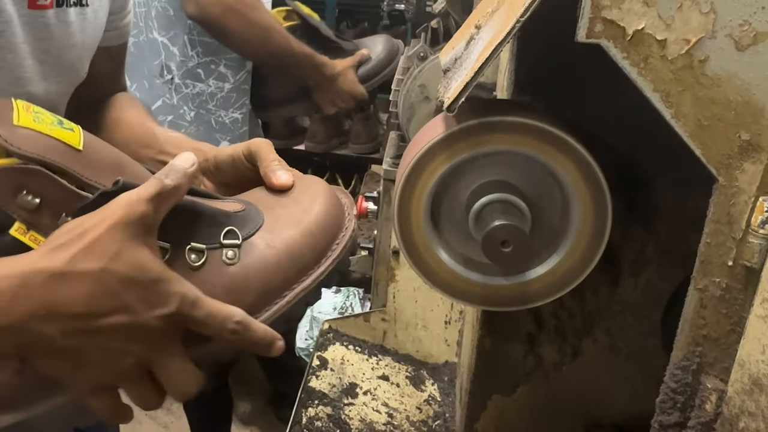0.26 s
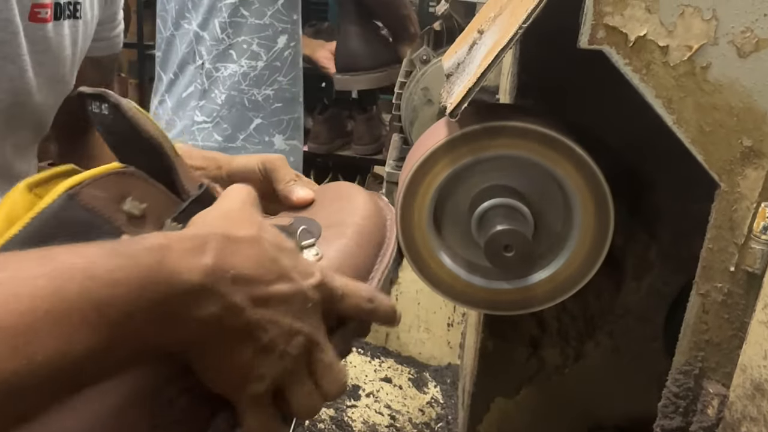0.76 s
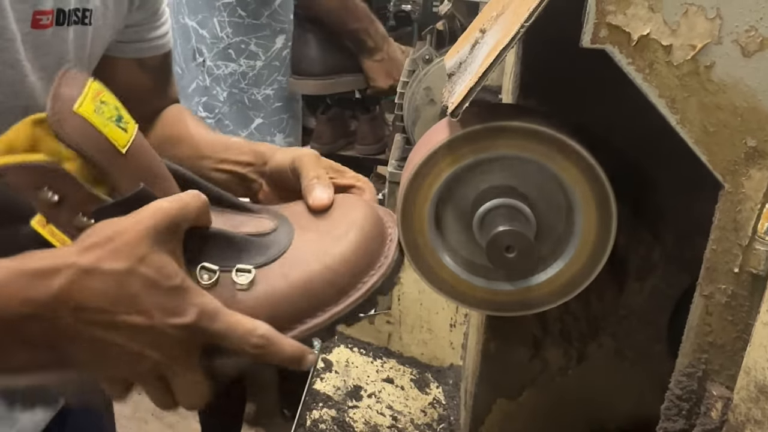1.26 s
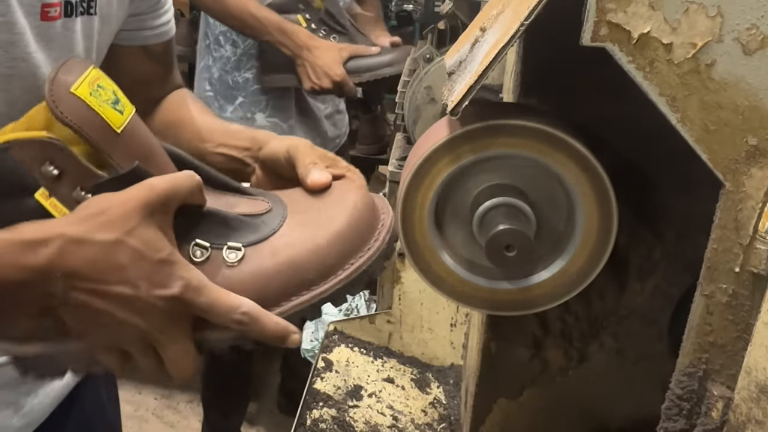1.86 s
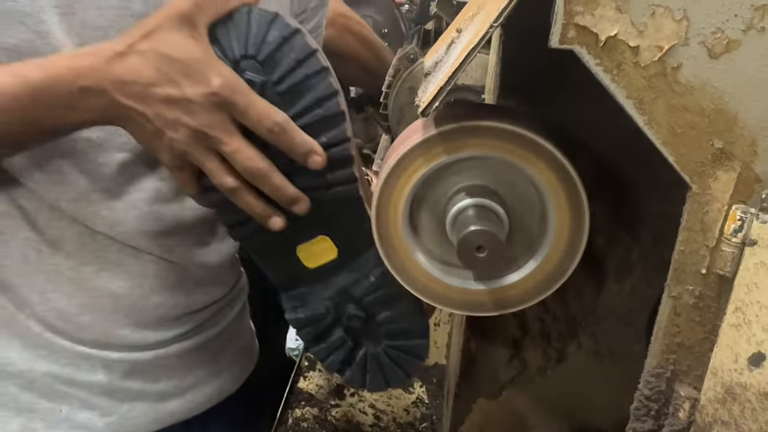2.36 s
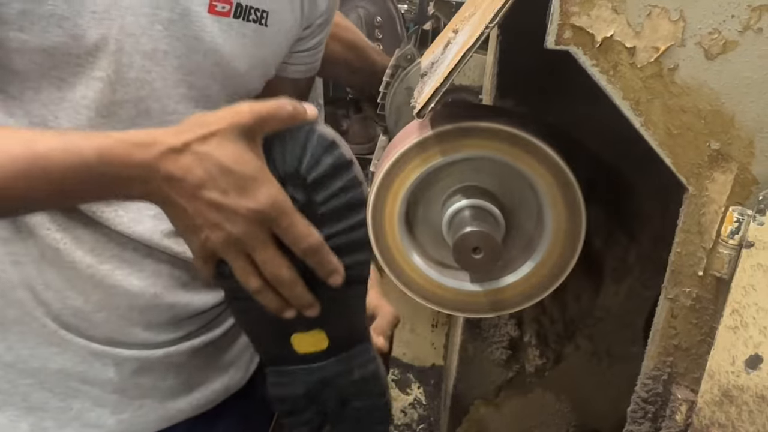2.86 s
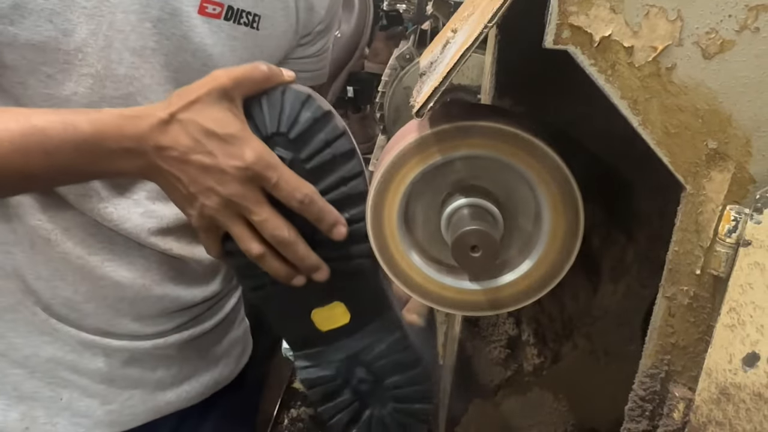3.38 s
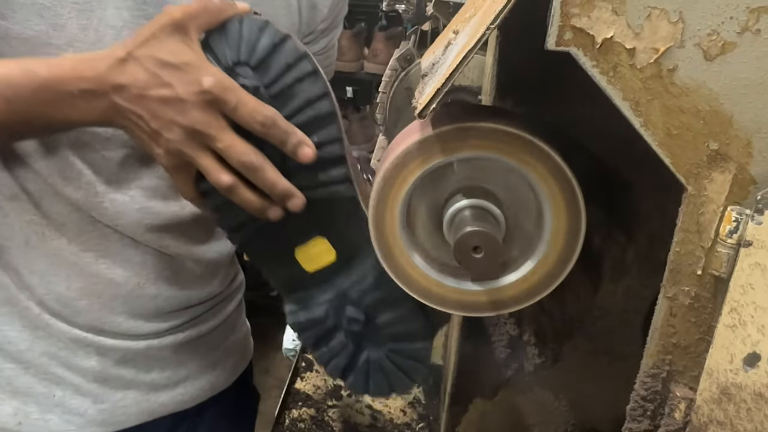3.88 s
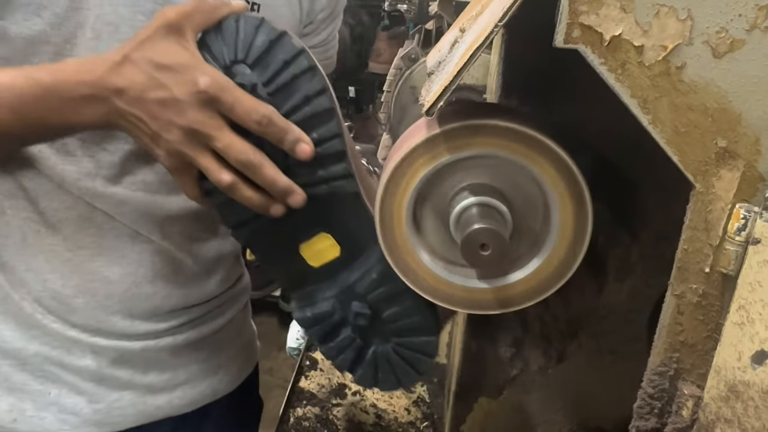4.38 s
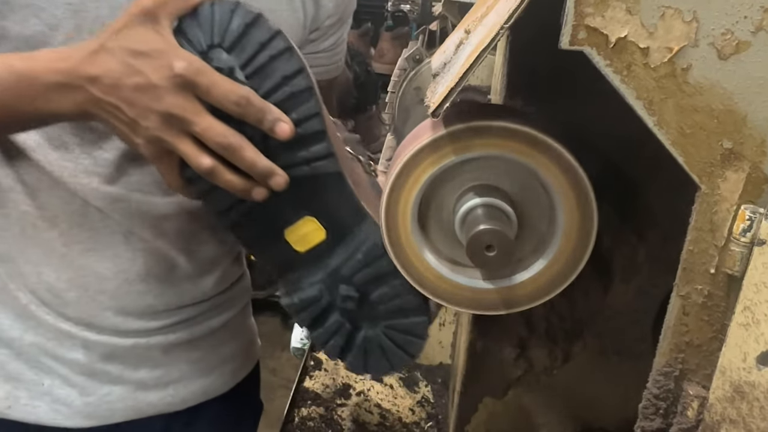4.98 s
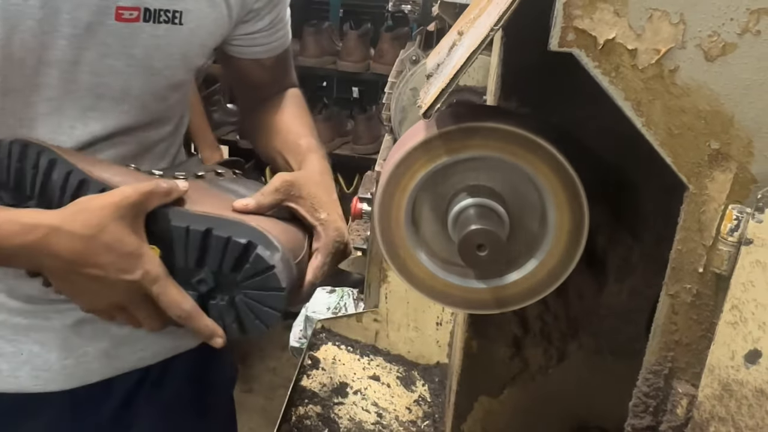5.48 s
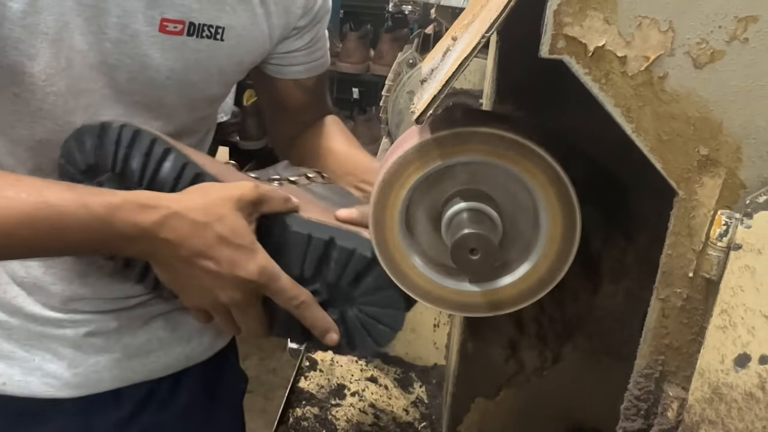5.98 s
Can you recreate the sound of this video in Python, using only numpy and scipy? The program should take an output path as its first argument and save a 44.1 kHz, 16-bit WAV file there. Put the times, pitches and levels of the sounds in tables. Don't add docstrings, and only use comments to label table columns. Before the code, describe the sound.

A boot is rubbed in short strokes on a fast spinning abrasive wheel, gritty hiss throbbing over a deep fan roar and steady hum.

```python
import sys
import numpy as np
from scipy import signal
from scipy.fft import rfft, irfft, next_fast_len
from scipy.io import wavfile
from scipy.ndimage import uniform_filter1d

SR = 44100
rng = np.random.default_rng(int(sys.argv[2]) if len(sys.argv) > 2 else 0)


def amplitude_ratio(level_db):
    exponent = np.asarray(level_db, float) / 20
    return 10 ** exponent


def generate_wav(sig):
    pcm = np.round(np.clip(np.atleast_2d(sig).T, -1, 1) * 32767).astype(np.int16)
    wavfile.write(sys.argv[1], SR, pcm)


N = 275075
T = np.arange(N) / SR

# frequency in Hz, level in dB.
ROAR_SPECTRUM = [(18, -63), (32, -37.5), (50, -19.5), (96, -13), (143, -5), (200, -12), (235, -19),
                 (300, -18), (366, -16), (413, -23), (600, -23.5), (750, -29.5), (1150, -32.5), (1800, -41),
                 (2400, -55)]
# frequency in Hz, width in Hz, lift in dB.
DUCT_MODES = [(95, 4, 4), (144.1, 23.8, 7.5), (196.7, 13.7, 8), (371.7, 35, 5), (458.2, 12.6, 10.5),
              (659, 21, 5.5)]
# time in seconds, level in dB.
ROAR_LEVEL = [(0, -18), (.7, -19), (2, -18.5), (2.5, -17), (3.5, -18), (4.1, -17), (5.1, -18.5),
              (5.7, -18.5), (6.24, -19)]
# time in seconds, level in dB.
BODY_SHIELD = [(0, -42.5), (2.1, -42.5), (2.4, -42), (4, -41.5), (4.5, -42.5), (6.24, -41)]
# left level in dB, right level in dB, left lead in radians, waver in dB.
BLADE_TONES = [
    (-30, -28, -1.03, 1.45),
    (-37, -33, -1.15, 2.15),
    (-46, -48, -1.27, 2),
    (-49.5, -48, 0.13, 1.5),
]
# frequency in Hz, level in dB.
AIR_SPECTRUM = [(1500, -8), (2200, -2), (3000, -3), (4000, -12.5), (5000, -15), (6000, -7.5), (6800, -5),
                (7600, -8.5), (9200, -22.5), (10300, -22), (11500, -55), (13000, -45), (15500, -23)]
# time in seconds, level in dB.
NEXT_WHEEL = [(0, -1), (2.0, 0.2), (2.6, -1.5), (4.3, 4.5), (5.4, -1), (6.24, 3)]
# time in seconds, peak in dB, ring in Hz, wash T60 in seconds.
KNOCKS = [
    (.383, -37, 804, 0.091),
    (.553, -32.5, 1110, 0.22),
    (.572, -43, 1390, 0.13),
    (1.207, -29.5, 850, 0.57),
    (1.231, -30.5, 1690, 0.3),
    (2.252, -33, 2020, .05),
    (3.741, -39, 1100, 0.11),
    (5.693, -33.5, 925, 0.2),
    (5.83, -37, 1280, .4),
]
# frequency in Hz, level in dB.
TOE_SPECTRUM = [(2000, -11), (2700, -10.5), (3400, -2), (4400, -5), (6000, -2.5), (7500, -3), (9800, -2),
                (11500, 3.5), (13000, -2.5), (15700, 0.5)]
# frequency in Hz, level in dB.
SIDE_SPECTRUM = [(1200, -12), (2000, -8.5), (3200, -4), (3900, -7.5), (5500, -4.5), (7000, -4),
                 (8800, -2.5), (10500, -2), (12000, 0), (14000, 0), (15700, 0)]
# frequency in Hz, width in Hz, lift in dB.
SHELL_MODES = [(4580, 560, 4.5), (6950, 280, 7), (8460, 790, 2)]
# frequency in Hz, width in Hz, lift in dB.
TOE_MODES = [(4600, 120, 10), (5200, 160, 6), (3900, 160, 4)]
# start in seconds, length in seconds, first pressure in dB,
# last pressure in dB, brightness in dB.
RESTS = [
    (.72, 0.079, -47, -47, 2),
    (1.02, 0.72, -43.5, -43, -1.5),
    (2.2, 0.082, -41, -37, -5),
    (2.3, 1.32, -40.5, -42, 3),
    (3.7, .37, -37, -42.5, 0.5),
    (4.07, .74, -43, -38.5, 0),
    (4.81, .41, -40, -44, 0),
    (5.81, .45, -41, -38, 1),
]
TOE_STROKES = [(.8, 0.091, -38.5, -27.5, -2.5), (.9, .11, -28.5, -36, 3), (1.145, .025, -37.5, -38, -1.2),
               (1.2, 0.18, -29, -29, -2), (1.385, 0.054, -35, -41.5, -2.2), (1.555, 0.013, -34, -33, -3),
               (1.592, 0.16, -30, -31, -2.2), (1.765, 0.02, -37.5, -42.5, -5),
               (2.064, .134, -29.5, -30.5, -2)]
SIDE_STROKES = [(2.34, 0.078, -40.5, -36.5, -5.5), (2.45, 0.079, -39, -34, 6.5), (2.57, .22, -38, -34.5, 2),
                (2.8, .015, -32, -35.5, 6.5), (2.85, .13, -39, -35, 1), (3.0, .19, -42.5, -31.5, 5.5),
                (3.26, 0.038, -32.5, -38.5, 3), (3.32, .04, -33, -38.5, 2), (3.37, .09, -33, -34, 3.5),
                (3.49, .06, -35, -36.5, 2), (3.6, 0.062, -31, -37.5, -5.5), (3.7, 0.15, -37.5, -34.5, 4),
                (5.0, 0.027, -42, -35, 2.5), (5.06, .12, -40.5, -34, 3), (5.51, 0.11, -39.5, -49.5, 0.5),
                (5.815, 0.045, -39, -41, 2), (5.9, 0.057, -40, -35, 5.5), (6.0, 0.19, -39.5, -37, 2.5)]
# time in seconds, offset in turns, creep in turns per second.
GRIPS = [(0, -1.5, 1.3), (1.03, .14, 1.5), (1.175, .83, 1), (1.5, .27, .55), (2.0, .66, -.6),
         (2.24, .22, -.3), (3.68, -.5, 0)]
# time in seconds, peak in dB, length in seconds.
GRAZES = [(0.996, -23, 0.01), (1.183, -17, 0.01), (1.835, -28.5, 0.0073), (1.9036, -35, 0.01),
          (1.979, -24.5, 0.013), (2.0254, -19.5, 0.0091), (2.32, -24, 0.011), (2.456, -22, 0.014),
          (2.646, -21, 0.009), (2.8, -21, 0.0067), (2.931, -20.5, 0.024), (2.976, -21, 0.014),
          (3.039, -22, 0.013), (3.07, -26, 0.012), (3.1, -23, 0.013), (3.1335, -19, 0.0067),
          (3.267, -21, 0.02), (3.314, -21, 0.0079), (3.595, -22.5, 0.016), (3.705, -25, 0.0087),
          (4.222, -29.5, 0.017), (4.436, -35, 0.012), (4.547, -26, 0.014), (4.86, -24.5, 0.014),
          (5.02, -30, 0.0086), (5.242, -31, 0.014), (5.809, -23, 0.02)]
# frequency in Hz, left lead in radians, likeness 0-1, left over right in dB.
PORTS = [(90, -.1, .995, -.8), (220, -.2, .985, -1.8), (400, -.4, .8, .3), (650, -.8, .65, -3.5),
         (1500, -.5, .25, -.5), (2050, .1, .8, 0), (3100, 1.3, .6, 0), (4300, .4, .76, 1.3),
         (6500, 1.1, .55, 1.5), (7700, 2.9, .45, 5), (8400, -.1, .9, 1.5), (11100, -3.14, .97, 0),
         (14300, -6.28, .9, 0), (15700, -7.6, .72, .5)]

WHEEL_HZ, BLADE_HZ = 49, 287.17
NEXT_WHEEL_EDGE_HZ = 3800
FIRST_TOUCH_S, TURN_OVER_S = .68, 2.17
LIFTED_DB, LIFTED_BRIGHT_DB = -55, -2
ATTACK_DB_PER_S, TOE_RELEASE_DB_PER_S, SIDE_RELEASE_DB_PER_S = 798, 797, 278
LIGHT_THROB_DB, HARD_THROB_DB, SIDE_THROB_DB = 5, 8, 2
DULL_THROB_DB_PER_DB = 0.9
BODY_DB, BODY_DB_PER_DB, SIDE_BODY_DB = -3.5, -0.35, 0.1


def evened(x):
    return x / np.sqrt(np.mean(x ** 2) + 1e-20)


def read(points, hz):
    f, *values = np.transpose(points)
    outside = -99 if len(values) == 1 else None
    return np.squeeze([np.interp(np.log(hz + 1), np.log(f + 1), v, outside) for v in values])


def follow(rows, t):
    s, *values = np.transpose(rows)
    return [np.interp(t, s, v) for v in values]


def lift(modes, hz):
    return sum(db / (1 + (2 * (hz - f) / width) ** 2) for f, width, db in modes)


def drift(per_s, shape):
    size = max(round(SR / per_s / 2), 1)
    return evened(uniform_filter1d(uniform_filter1d(rng.standard_normal(shape), size), size))


def patches(hz, s, bins, frames):
    field = rng.standard_normal((len(hz), len(s)))
    return evened(uniform_filter1d(uniform_filter1d(field, bins, 0), frames, 1))


def coloured(x, size, rule_db):
    overlap = size * 3 // 4
    hz, s, z = signal.stft(x, SR, nperseg=size, noverlap=overlap)
    z = z * amplitude_ratio(rule_db(hz[:, None], s))
    return signal.istft(z, SR, nperseg=size, noverlap=overlap)[1][..., :N]


def fan_roar():
    def rule_db(hz, s):
        shield_db = 0.18 * (follow(BODY_SHIELD, s)[0] + 42.83)
        tilt_db = np.clip((hz - 220) / 80, 0, 1) * shield_db
        colour_db = read(ROAR_SPECTRUM, hz[:, 0])[:, None] + lift(DUCT_MODES, hz)
        return colour_db + tilt_db + 0.83 * patches(hz, s, bins=8, frames=6)

    level = amplitude_ratio(follow(ROAR_LEVEL, T)[0] + 0.74)
    return level * evened(coloured(rng.standard_normal((2, N)), 4096, rule_db))


def blade_tones():
    turns = np.cumsum(BLADE_HZ + .5 * drift(1.26, N)) / SR
    shield_db = follow(BODY_SHIELD, T)[0]
    shield_db = 4.2 * (shield_db - shield_db.mean())
    out = np.zeros((2, N))
    for k, (left_db, right_db, lead, waver_db) in enumerate(BLADE_TONES, 1):
        level_db = waver_db * drift(5.9, N) + (k == 2) * shield_db
        angle = 2 * np.pi * (k * turns + rng.random()) + 0.034 * drift(3.0, N)
        level = np.sqrt(2) * amplitude_ratio(level_db + [[left_db], [right_db]])
        out += level * np.cos(angle + [[lead], [0]])
    return out


def air():
    def rule_db(hz, s):
        low_db = np.clip((NEXT_WHEEL_EDGE_HZ - hz) / 250, 0, 1) * follow(NEXT_WHEEL, s)[0]
        return read(AIR_SPECTRUM, hz[:, 0])[:, None] + low_db + patches(hz, s, bins=10, frames=20)

    return amplitude_ratio(-42.5) * evened(coloured(rng.standard_normal((2, N)), 512, rule_db))


def knocks():
    out, t = np.zeros((2, N)), np.arange(SR // 2) / SR
    for s, peak_db, ring_hz, t60_s in KNOCKS:
        band = signal.butter(2, [ring_hz * 0.77, ring_hz * 1.97], "band", fs=SR, output="sos")
        wash = evened(signal.sosfilt(band, rng.standard_normal((2, len(t)))))
        wash *= amplitude_ratio(-60 * t / t60_s) * np.minimum(t / 0.0047, 1)
        ring = np.sin(2 * np.pi * ring_hz * t) * amplitude_ratio(-60 * t / 0.027)
        blow = amplitude_ratio(peak_db) * (1.5 * ring * [[1], [0]] + wash)
        part = out[:, round(s * SR):][:, :len(t)]
        part += blow[:, :part.shape[1]]
    return out


def hand(t):
    press_db = np.full(len(t), float(LIFTED_DB))
    bright_db = np.full(len(t), float(LIFTED_BRIGHT_DB))
    contacts = ((RESTS, TOE_RELEASE_DB_PER_S), (TOE_STROKES, TOE_RELEASE_DB_PER_S),
                (SIDE_STROKES, SIDE_RELEASE_DB_PER_S))
    for rows, release in contacts:
        for start, length, first_db, last_db, tone_db in rows:
            db = first_db + (last_db - first_db) * np.clip((t - start) / length, 0, 1)
            db -= ATTACK_DB_PER_S * np.maximum(start - t, 0)
            db -= release * np.maximum(t - start - length, 0)
            bright_db = np.where(db > press_db, tone_db, bright_db)
            press_db = np.maximum(db, press_db)
    return press_db, bright_db


def rim():
    grips = np.transpose(GRIPS)
    s, turns, creep = grips[:, np.searchsorted(grips[0], T, "right") - 1]
    return WHEEL_HZ * T + uniform_filter1d(turns + creep * (T - s), size=900)


def wheel_throb(press_db, bright_db):
    turns = rim()
    hard = np.clip((press_db + 38.5) / 7, 0, 1)
    toe_db = LIGHT_THROB_DB + (HARD_THROB_DB - LIGHT_THROB_DB) * hard
    side_db = SIDE_THROB_DB + DULL_THROB_DB_PER_DB * np.maximum(-bright_db, 0)
    depth_db = uniform_filter1d(np.where(T < TURN_OVER_S + .05, toe_db, side_db), size=600)
    bite = rng.standard_normal(1000)[np.round(turns).astype(int) + 10]
    angle = 2 * np.pi * turns
    high_spot = np.cos(angle + .4 * np.cos(angle))
    high_spot = 1 - (1 - high_spot) ** 2 / 2
    bite_db = 0.15 * depth_db * bite * (1 + high_spot) / 2
    throb = amplitude_ratio(0.93 * depth_db * high_spot + bite_db + drift(33.0, N))
    return throb / np.sqrt(uniform_filter1d(throb ** 2, size=2700))


def graze_power():
    power = np.zeros(N)
    for s, peak_db, length in GRAZES:
        u = np.clip((T - s) / length, 0, 9)
        power += amplitude_ratio(peak_db - 6.0) ** 2 * (u * 6.3) ** 2 * np.exp(1 - 6.27 * u)
    return power


def rub():
    press_db, bright_db = hand(T)
    level = amplitude_ratio(press_db + 6.0) * wheel_throb(press_db, bright_db)
    level *= np.clip((T - FIRST_TOUCH_S) / 0.023, 0, 1)
    power = level ** 2 + graze_power()
    grit = amplitude_ratio(1.2 * drift(780.0, N))

    def rule_db(hz, s):
        side = np.clip((s - TURN_OVER_S) / .1, 0, 1)
        toe_db = read(TOE_SPECTRUM, hz[:, 0])[:, None]
        side_db = read(SIDE_SPECTRUM, hz[:, 0])[:, None]
        colour_db = (1 - side) * toe_db + side * side_db
        push_db, tone_db = hand(s)
        body_db = BODY_DB + side * SIDE_BODY_DB + BODY_DB_PER_DB * (np.maximum(push_db, -44) + 35.5)
        colour_db = colour_db + np.clip((4000 - hz) / 600, 0, 1) * (body_db + 4)
        tone_db = uniform_filter1d(tone_db, size=12) - ((1 - side) * -1.5 + side * 1.1)
        colour_db = colour_db + np.clip((hz - 8000) / 4000, 0, 1) * tone_db
        light = np.clip(1.5 - abs(push_db + 41) / 5, 0, 1) * (1 - side)
        ring_db = (1 - .5 * side) * lift(SHELL_MODES, hz) + light * lift(TOE_MODES, hz)
        return colour_db + ring_db + (2.2 - .7 * side) * patches(hz, s, bins=3, frames=30)

    scrape = np.sqrt(power) * grit * rng.standard_normal((2, N))
    return coloured(scrape, 256, rule_db) * amplitude_ratio(3.0)


def ports(pair):
    size = next_fast_len(N)
    lead, like, over_db = read(PORTS, np.fft.rfftfreq(size, 1 / SR))
    a, b = rfft(pair, size)
    like = np.clip(like, 0, 1)
    left = a * np.exp(1j * lead) * amplitude_ratio(over_db / 2)
    right = (like * a + np.sqrt(1 - like ** 2) * b) * amplitude_ratio(-over_db / 2)
    return irfft(np.array([left, right]), size)[:, :N]


def scene():
    return ports(fan_roar() + air() + knocks() + rub()) + blade_tones()


def band_limit(x):
    return signal.sosfilt(signal.butter(12, 16320, fs=SR, output="sos"), x)


def record(dry):
    return band_limit(dry)


dry = scene()
out = record(dry)
generate_wav(out)
```